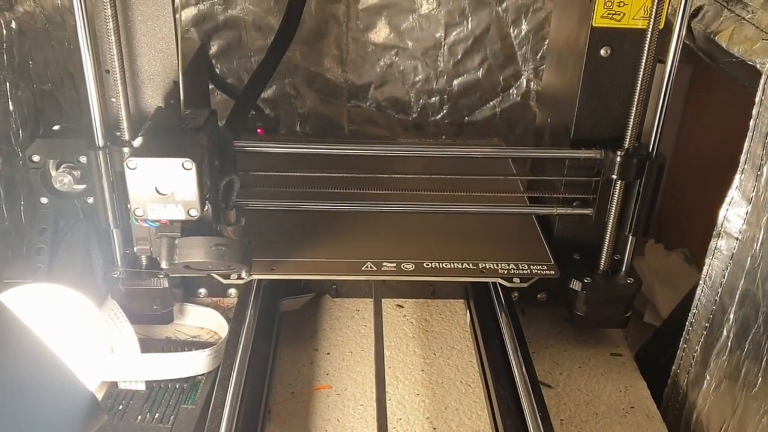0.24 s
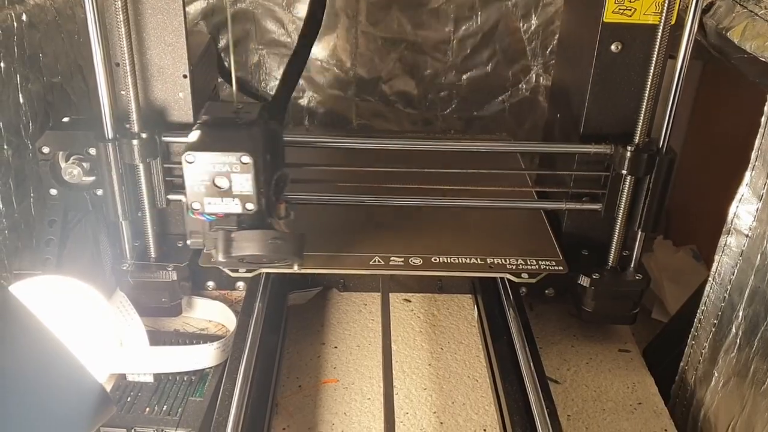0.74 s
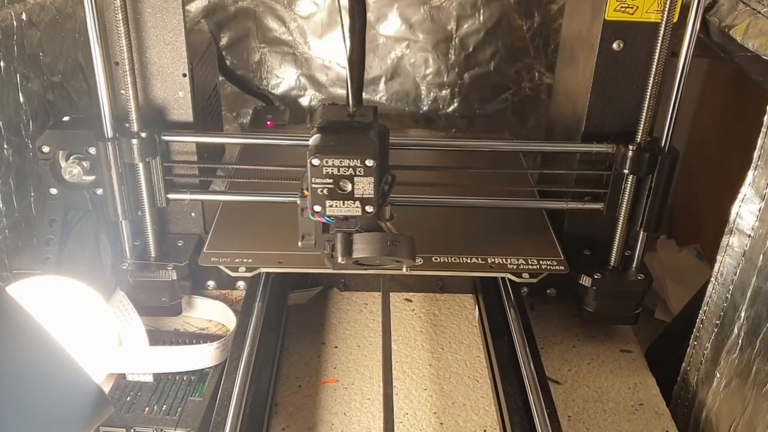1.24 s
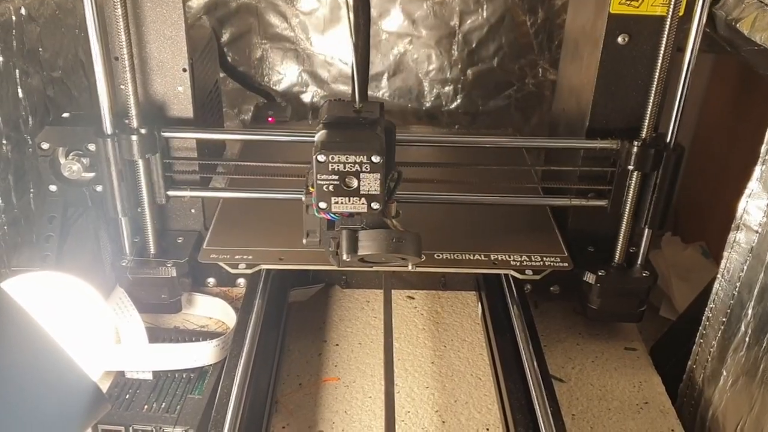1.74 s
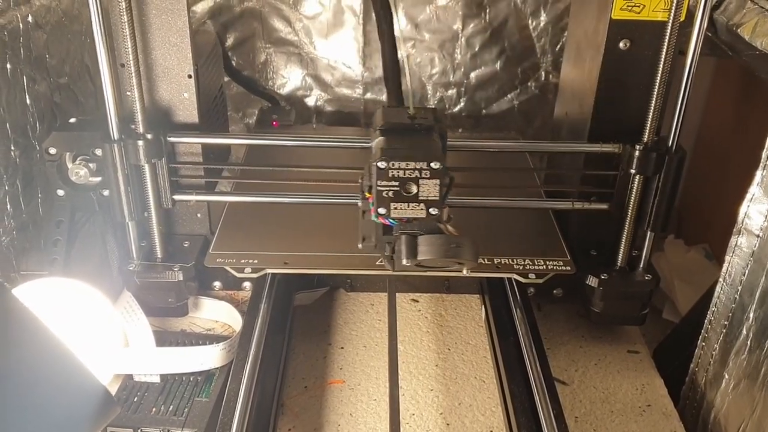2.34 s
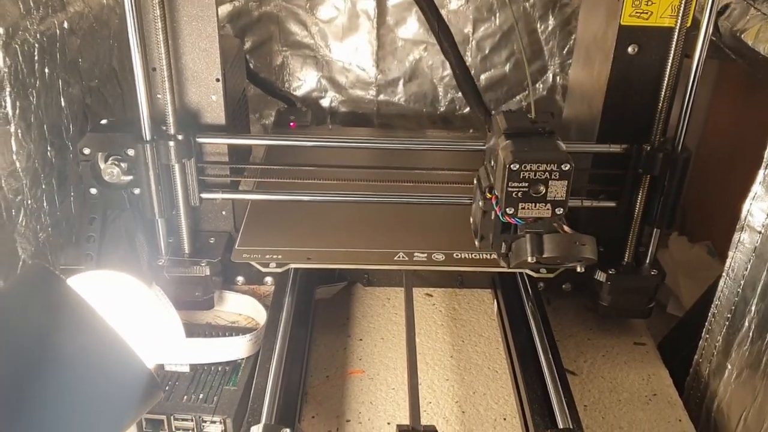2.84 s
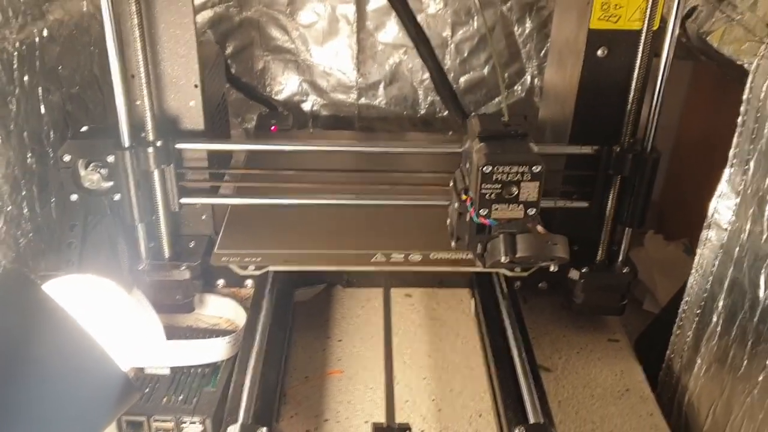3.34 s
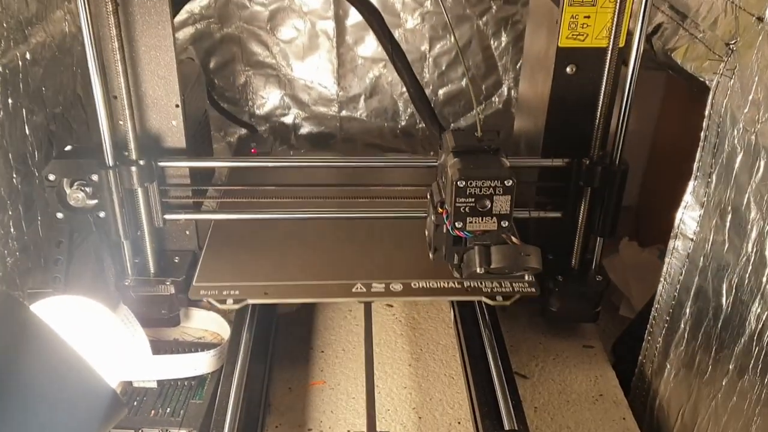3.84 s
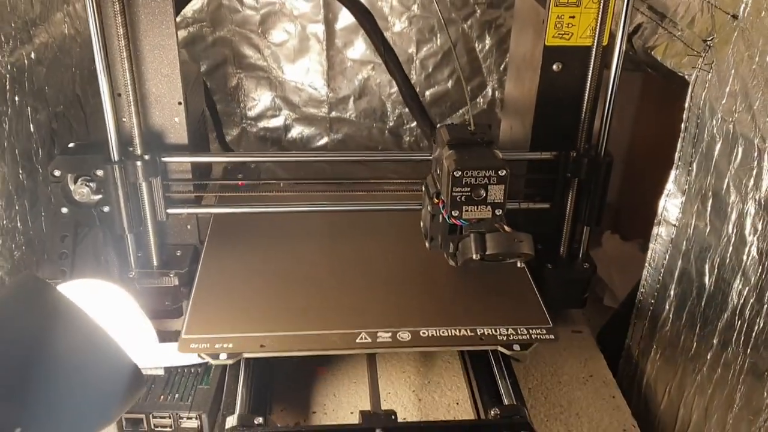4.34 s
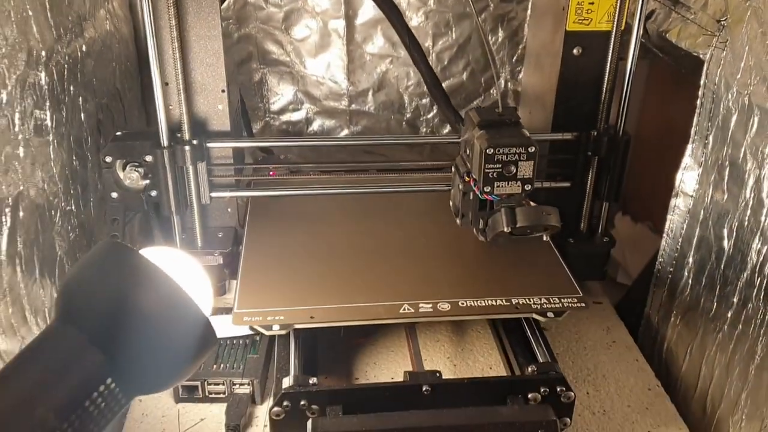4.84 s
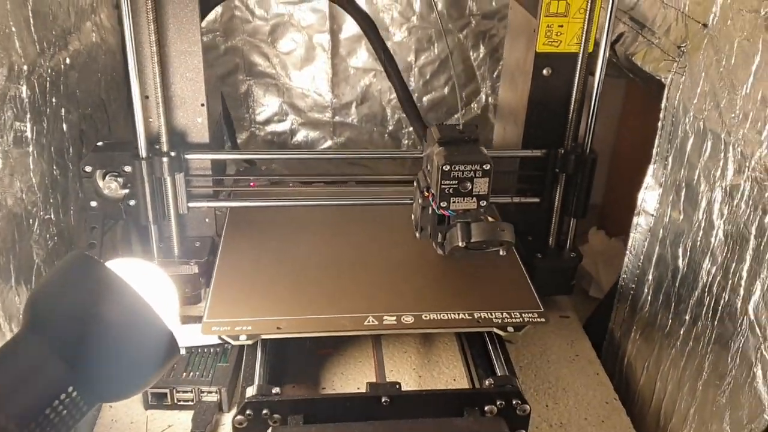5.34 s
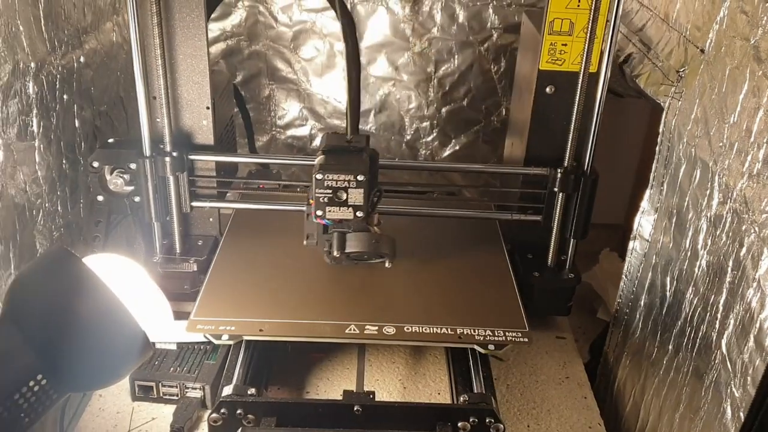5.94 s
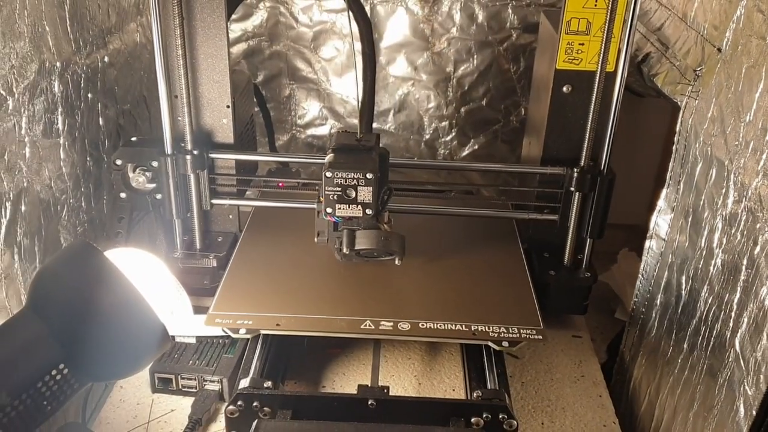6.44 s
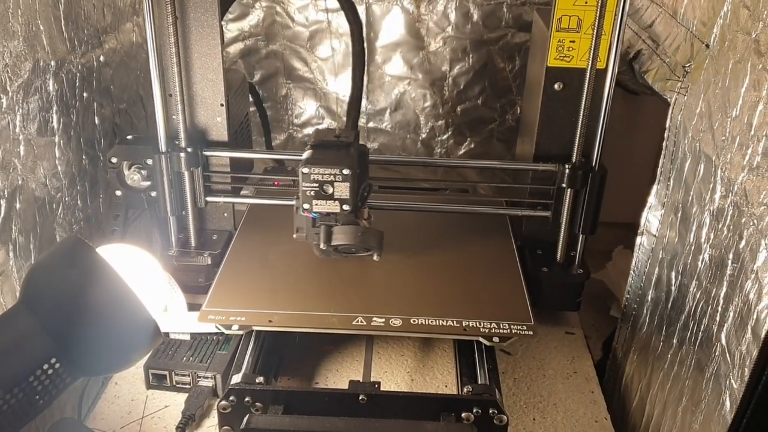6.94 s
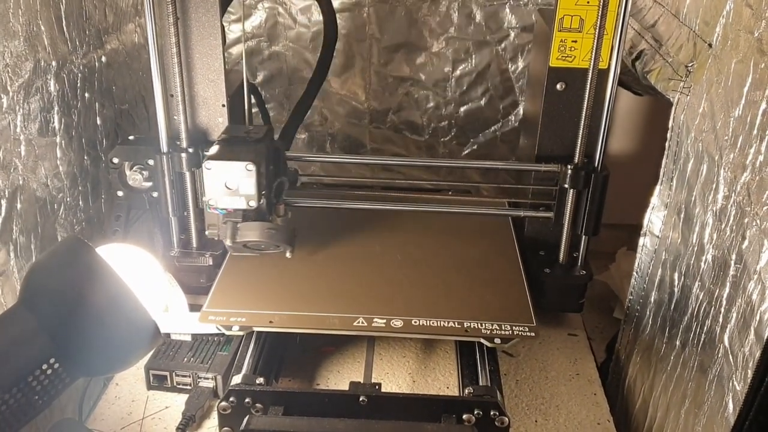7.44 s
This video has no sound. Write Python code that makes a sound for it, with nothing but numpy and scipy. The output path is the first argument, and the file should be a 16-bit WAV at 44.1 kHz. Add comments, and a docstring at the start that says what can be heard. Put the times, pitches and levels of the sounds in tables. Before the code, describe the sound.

A close stereo view of a 3D printer in a small reflective enclosure, with faint fan murmur and thin, high motor hiss throughout. It opens with four dull frame-buzzing taps, about a ninth of a second apart, and a lift-off thud near 0.5 s. A belt move follows until 1.4 s: the whine rises quickly, holds steady with grainy bearing rattle and brighter hiss, then falls into a low double jolt. Four taps and a lift-off lead to the next move, 2.05-2.95 s. Scuffs surround the taps around 3.1-3.5 s. The heavier, louder bed move runs 3.6-4.55 s, with short hollow booms. During the following taps, a hard gritty rub with a sinking groan strikes at 4.9 s. Lighter head moves run 5.2-6.1 s and from 6.8 s, separated by four more taps; the last whir slows near 7.7 s.

```python
"""Printer bed probing

A 3D printer probes its bed inside a foil-lined enclosure, over fan murmur and the hiss of holding current.
Five times a belt axis speeds up, cruises and brakes: step-locked whine, clumped bearing clicks, chopper hiss.
Between moves the lead screws dive, tap the bed four times and lift off; swelling tones make the frame drone.
Tuned booms, band-limited scuffs and one hard rub of grit and sinking tone break in."""
import sys
import numpy as np
from scipy import signal
from scipy.fft import rfft, irfft, next_fast_len
from scipy.io import wavfile
from scipy.ndimage import uniform_filter1d, map_coordinates

SR = 44100
rng = np.random.default_rng(int(sys.argv[2]) if len(sys.argv) > 2 else 0)


def materialize(psi):
    """Save the field psi as 16-bit PCM at rate SR to the path in sys.argv[1].

    A 1-D psi becomes a single channel; in a 2-D psi each row is a channel.
    """
    bounded = np.clip(np.atleast_2d(psi).T, -1, 1)
    quanta = np.round(bounded * 32767).astype(np.int16)
    wavfile.write(sys.argv[1], SR, quanta)


N = 338555  # length in samples


def amp(db):
    """Decibels to gain."""
    return 10 ** (np.asarray(db) / 20)


def unit(x):
    """Scale to rms 1."""
    return x / np.sqrt(np.mean(x ** 2) + 1e-20)


def clock():
    """Time of each sample in seconds."""
    return np.arange(N) / SR


def along(points, hz):
    """Read a (frequency [Hz], value) curve on a log frequency axis."""
    f, v = np.transpose(points)
    return np.interp(np.log(hz + 1), np.log(f + 1), v)


def curves(rows):
    """One value per sample for each column after the time."""
    s, *columns = np.transpose(rows)
    return [np.interp(clock(), s, column) for column in columns]


def wobble(rate, size=N):
    """A smooth random curve, rate knots a second."""
    knots = rng.standard_normal(int(size * rate / SR) + 4)
    return map_coordinates(knots, [np.arange(size) * rate / SR])


def filtered(x, response):
    """Shape x by a response given as a function of frequency."""
    m = next_fast_len(x.shape[-1] + 8192)
    return irfft(rfft(x, m) * response(np.fft.rfftfreq(m, 1 / SR)), m)[..., :x.shape[-1]]


def noise(spectrum, size=N):
    """Mid and side noise of rms 1, coloured by a spectrum."""
    white = rng.standard_normal((2, size))
    return unit(filtered(white, lambda hz: amp(along(spectrum, hz))))


def swell(x, centre, half):
    """A smooth bell-shaped rise and fall around a centre."""
    return np.exp(-.5 * ((x - centre) / half) ** 2)


def turning(hz):
    """Phase of a changing frequency."""
    return 2 * np.pi * np.cumsum(hz) / SR


def tone(phase):
    """Mid and side sine of rms 1, each arriving at a phase of its own."""
    return np.sqrt(2) * np.sin(phase + rng.uniform(0, 2 * np.pi, (2, 1)))


def reverb(x, seconds, t60, wet_db):
    """Add a decaying noise tail to x; wet_db is the level of the tail over the direct sound."""
    t = np.arange(int(seconds * SR)) / SR
    tail = rng.standard_normal((2, len(t))) * amp(-60 * t / t60)
    wet = signal.fftconvolve(x, tail / np.linalg.norm(tail[0]), axes=1)[:, :x.shape[1]]
    return x + amp(wet_db) * wet


def enclosure(x, t60, wet_db):
    """Dense short reflections of the foil walls ripple the spectrum; the result has rms 1."""
    return unit(reverb(x, .2, t60, wet_db))


def room(x, t60, wet_db):
    """A soft tail from the room outside the enclosure."""
    return reverb(x, .5, t60, wet_db)


# Probings, four even taps then a lift-off: (lift-off time [s], pace [s], extra wait after the first tap [s],
# tap level [dB], rebound level [dB], lift start level [dB], lift stop level [dB],
# frame pitch [Hz], jolt half length [s])
PROBES = [(0.482, .113, 0, -36.5, -42.5, -36, -36.5, 153, .0095),
          (2.049, .115, 0, -36.3, -46, -33.5, -38, 154, .0098),
          (3.619, .116, 0, -33.2, -38.5, -32, -31, 156, .0072),
          (5.212, .114, .043, -35.5, -39.5, -36, -32, 156, .008),
          (6.786, .113, .018, -37.8, -42, -35.8, -34.3, 152, .0115)]
TAP_COUNT = 4


def tap_times(probe):
    """The taps of one probing, counted back from the lift-off at its pace."""
    lift, pace, wait = probe[:3]
    return [lift - k * pace - wait * (k == TAP_COUNT) for k in range(TAP_COUNT, 0, -1)]


# Each probing place: (creep level [dB], creep pitch [Hz], creep half length [s],
# holding current hiss level [dB], screw rasp level relative to the strokes [dB])
PLACES = [(-45, 82, 0.019, -56.5, -31.5), (-46, 84.5, 0.03, -54.5, -44), (-42, 82.5, 0.03, -52.5, -26),
          (-42.5, 83, 0.032, -51.5, -23.5), (-43, 88, 0.04, -51.5, -21.5)]


def resting():
    """Holding hiss and screw rasp in dB: steady through each probing, changing during the moves."""
    rows = []
    for probe, place in zip(PROBES, PLACES):
        for s in (tap_times(probe)[0] - .25, probe[0] + .1):
            rows.append((s, *place[-2:]))
    return curves(rows)


# Machine at rest, room murmur: (frequency [Hz], relative level per Hz [dB])
ROOM = [(18, -27), (50, 15), (170, 11.5), (280, 6.5), (480, 3.5), (640, -3.5), (870, -6.5), (1100, 2),
        (2100, 1.5), (3100, -17.5), (5000, -30), (9000, -26)]
# Faint whistle of the holding current: (frequency [Hz], relative level per Hz [dB])
WHISTLE = [(10300, -38), (11100, 3), (11300, 3), (11550, -3), (12300, -28)]
WHISTLE_S, WHISTLE_HALF_S, WHISTLE_DB = 6.48, 0.43, -62.5  # centre, half length, level
# Chopper hiss as the motor bodies radiate it: (frequency [Hz], relative level per Hz [dB])
CHOPPER = [(3000, -42.5), (6400, -16), (9200, -17), (10300, -8.5), (11800, -3.5), (13200, -4), (15200, 1),
           (16000, 0.5)]


def idle():
    """Enclosed noise for the fans, and high bands for the motors' holding current and its whistle."""
    air = enclosure(noise(ROOM), t60=0.15, wet_db=-4.5)
    murmur = amp(1.8 * wobble(12)) * air
    whistle = amp(WHISTLE_DB) * swell(clock(), WHISTLE_S, WHISTLE_HALF_S) * noise(WHISTLE)
    return amp(-61.0) * murmur + amp(resting()[0]) * noise(CHOPPER) + whistle


# Booms of the bed and frame: (time [s], level before a 5 dB cut [dB], pitch [Hz], half length [s])
BOOMS = [(2.24, -50, 50.1, 0.048), (3.663, -43, 332, 0.0042), (3.684, -38, 50, 0.011),
         (3.776, -37.5, 280, 0.0087), (3.85, -41.5, 576, 0.019), (4.02, -35, 573, .016),
         (4.178, -40, 55.4, 0.017), (6.963, -49, 54, 0.036)]


def booms():
    """The bed and frame swell briefly at their resonances, each a sine under a bell envelope."""
    t = clock()
    return sum(amp(db - 5.0) * swell(t, s, half) * tone(2 * np.pi * hz * t) for s, db, hz, half in BOOMS)


RUB_START_S, RUB_DB = 4.912, -45
RUB_ATTACK_S, RUB_HOLD_S, RUB_DECAY_DB_PER_S = 0.027, 0.052, 140  # envelope of the grit
RUB_HZ, RUB_SAG_OCTAVES_PER_S = 500, 7.5  # the tone's starting pitch and fall
RUB_TONE_DB, RUB_TONE_S = -3.5, 0.12  # mean tone level relative to RUB_DB, and its hold
# Grit of the rub: (frequency [Hz], relative level per Hz [dB])
RUB_GRIT = [(150, -7), (300, 9.5), (550, -3), (900, 3.5), (1300, 2), (2200, 1.5), (3000, -9), (4200, -22),
            (9000, -35)]


def rub():
    """A hard rub: grit starts abruptly and dies away around a rough sinking tone."""
    t = np.clip(clock() - RUB_START_S, 0, 1)

    def held(hold):
        return np.minimum(t / RUB_ATTACK_S, 1) * amp(-RUB_DECAY_DB_PER_S * np.maximum(t - hold, 0))

    phase = turning(RUB_HZ * 2 ** (-RUB_SAG_OCTAVES_PER_S * t)) + 0.77 * wobble(220)
    grit = noise(RUB_GRIT) * amp(1.0 * wobble(400)) * (1 + .5 * np.cos(phase))
    groan = amp(RUB_TONE_DB + 2.5 * wobble(120)) * (tone(phase) + 0.28 * tone(2 * phase))
    return amp(RUB_DB) * (held(RUB_HOLD_S) * grit + held(RUB_TONE_S) * groan)


# Dives of the head after a move: (start time [s], stop time [s],
# starting jolt level [dB], stopping jolt level [dB], frame pitch [Hz])
DIVES = [(1.396, 1.44, -35.5, -31.5, 158), (2.958, 3.005, -31, -30.5, 163),
         (4.531, 4.603, -31.5, -31.5, 155), (6.14, 6.201, -34, -33.5, 158)]
DIVE_JOLT_S, DIVE_RUN_DB = 0.01, -6.5  # jolt half length; drone of the run relative to the stopping jolt
SETTLE_S, SETTLE_DB = 0.041, -8  # the frame swings once more after the stop; level relative to it
REBOUND_S, REBOUND_HALF_S = 0.043, 0.014  # each hop off the bed ends with another jolt this much later
LIFT_S, LIFT_PITCH, LIFT_LENGTH = .05, 1.055, 1.23  # duration; jolt pitch and length as multiples of a tap's


def jolts():
    """Lead screw strokes and the frame's swings: (time [s], peak level [dB], pitch [Hz], half length [s])."""
    rows = []
    for start, stop, start_db, stop_db, hz in DIVES:
        length = stop - start
        rows += [(start, start_db, hz, DIVE_JOLT_S), (stop, stop_db, hz, DIVE_JOLT_S),
                 (start + 0.55 * length, stop_db + DIVE_RUN_DB, hz, 0.12 * length),
                 (stop + SETTLE_S, stop_db + SETTLE_DB, hz, REBOUND_HALF_S)]
    for probe in PROBES:
        lift, _, _, tap_db, rebound_db, start_db, stop_db, hz, half = probe
        for s in tap_times(probe):
            rows += [(s, tap_db, hz, half), (s + REBOUND_S, rebound_db, hz, REBOUND_HALF_S)]
        for s, db in [(lift, start_db), (lift + LIFT_S, stop_db)]:
            rows.append((s, db, hz * LIFT_PITCH, half * LIFT_LENGTH))
    return sorted(rows)


# Scuffs: (time [s], level [dB], half length [s], low edge [Hz], high edge [Hz])
SCUFFS = [(1.291, -51.5, 0.051, 500, 2330), (1.444, -62, 0.023, 500, 2280),
          (3.116, -54, 0.0094, 4600, 7470), (3.379, -67.5, 0.075, 4430, 7600),
          (3.484, -48, 0.027, 4830, 16100), (4.57, -53, 0.014, 900, 3220), (4.72, -58.5, .13, 696, 7000),
          (4.947, -55, 0.11, 2200, 7000)]
# Scuff of the nuts as a fast stroke stops: level relative to the jolt, half length, band edges
NUT_DB, NUT_HALF_S, NUT_LOW_HZ, NUT_HIGH_HZ = -24.5, .018, 534, 2140


def nut_scuffs():
    """A scuff at the hard stop of each dive and lift, in the columns of SCUFFS."""
    stops = [(stop, db) for _, stop, _, db, _ in DIVES]
    stops += [(lift + LIFT_S, db) for lift, *_, db, _, _ in PROBES]
    return [(s, db + NUT_DB, NUT_HALF_S, NUT_LOW_HZ, NUT_HIGH_HZ) for s, db in stops]


def scuffs():
    """Short grainy rubs: noise of flickering level, each in its own band."""
    out = np.zeros((2, N))
    for s, db, half, low_hz, high_hz in SCUFFS + nut_scuffs():
        near = np.abs(clock() - s) < 4 * half
        t = clock()[near]
        grains = rng.standard_normal((2, len(t))) * amp(1.15 * wobble(400, size=len(t)))
        band = lambda hz: 1 / np.sqrt((1 + (low_hz / (hz + 1)) ** 6) * (1 + (hz / high_hz) ** 8))
        out[:, near] += amp(db) * swell(t, s, half) * unit(filtered(grains, band))
    return out


CREEP_LEAD_S = 0.035  # the slow descent is loudest this long before each tap
DIVE_CREEP_DB = 4.5  # low note at the stop of a dive, relative to the creep


def creeps():
    """Low notes of the slow strokes and dives: (time [s], peak level [dB], pitch [Hz], half length [s])."""
    rows = []
    for probe, (db, hz, half, _, _) in zip(PROBES, PLACES):
        rows += [(s - CREEP_LEAD_S, db, hz, half) for s in tap_times(probe) + [probe[0]]]
        rows.append((probe[0] + .11, db - 2.5, hz + 3, .05))  # after the lift-off
    for (start, stop, *_), (db, hz, *_) in zip(DIVES, PLACES[1:]):
        rows += [(start - .014, db - 1, hz, .014), (stop, db + DIVE_CREEP_DB, hz, .016)]
    return sorted(rows)


def drone(rows):
    """Strength and phase of one tone that swells on each stroke and slides between their pitches."""
    t = clock()
    coarse = t[::32]
    strength = sum(amp(db) * swell(coarse, s, half) for s, db, hz, half in rows)
    return np.interp(t, coarse, strength), turning(curves(rows)[1])


# Trembling frame: (frequency [Hz], relative level per Hz [dB])
SHUDDER = [(25, -26), (50, -2), (85, -12), (115, 0), (140, -4), (175, 5), (220, -8), (270, -18), (600, -47),
           (1500, -92)]


def lead_screws():
    """The frame drones and shudders on every stroke, and the nuts rasp faintly on the threads."""
    stroke, stroke_phase = drone(jolts())
    creep, creep_phase = drone(creeps())
    hum = stroke * (np.sin(stroke_phase + 0.45 * wobble(90)) + amp(-40.5) * np.sin(2 * stroke_phase))
    hum += creep * np.sin(creep_phase + 0.5 * wobble(40))
    # averaging over 5000 samples keeps the frame trembling between strokes
    shaking = amp(-12) * np.abs(uniform_filter1d(stroke, size=5000))
    shudder = shaking * noise(SHUDDER)
    threads = noise([(150, 2.0), (350, 1), (750, -12), (1100, 4.5), (2100, -1), (3200, -16), (8000, -14)])
    rasp = amp(resting()[1]) * (stroke + shaking / 2) * threads
    quarter_turn = np.imag(signal.hilbert(hum))  # the side gets the hum a quarter cycle apart
    return np.array([hum, quarter_turn]) + shudder + rasp


def whine(phase, speed, orders, waver_db, waver_rad):
    """Partials locked to the coil cycle; each wavers, and the high ones sing only near full speed."""
    n = len(phase)

    def partial(k, db):
        level = amp(db + waver_db * wobble(9.0, size=n))
        return level * tone(k * phase + waver_rad * wobble(41.5, size=n))

    return sum(partial(k, db) * speed ** np.sqrt(k) for k, db in orders)


FRAME_HZ, FRAME_WIDTH_HZ = 160.4, 32.2  # ring of the frame that the low partials sweep through
SLOW_PARTIALS_DB = 1.5  # level of the second and fourth partials relative to the hum


def frame_sweep(phase, speed):
    """On a ramp the hum, its octave and the full-step tone each ring the frame as they cross its pitch."""
    n = len(phase)

    def crossing(k):
        ring = swell(k * STEP_HZ * speed, FRAME_HZ, FRAME_WIDTH_HZ)
        return ring * tone(k * phase + 0.99 * wobble(100, size=n))

    slow = crossing(2) + crossing(4)
    return amp(2.8 * wobble(60.05, size=n)) * (crossing(1) + amp(SLOW_PARTIALS_DB) * slow)


def rattle(phase, spectrum, band, grain_db, throb):
    """Bearing balls click in dense clumps, pushed along by the motor steps; mid has rms 1 inside the band."""
    n = len(phase)
    pushes = 1 + throb * np.cos(2 * phase)  # two pushes a coil cycle
    clicks = rng.standard_normal((2, n)) * amp(grain_db * wobble(700, size=n)) * pushes
    body = filtered(enclosure(clicks, t60=0.076, wet_db=1.5), lambda hz: amp(along(spectrum, hz)))
    return body / np.std(filtered(body[0], lambda hz: (hz > band[0]) & (hz < band[1])))


# Frame resonances under the rattle as the carriage passes:
# (time [s], half length [s], centre [Hz], width [Hz], gain at the centre [dB])
RINGS = [(0.703, 0.18, 1110, 129, 6), (1.266, 0.092, 1120, 130, 6.5), (2.501, 0.42, 450, 298.7, -2.5),
         (2.707, 0.1, 1800, 301.7, 2.5), (4.092, 0.087, 1400, 120, 7.5), (4.38, .03, 784, 119, -1),
         (5.443, 0.028, 1100, 150, 13), (5.877, 0.3, 1110, 85, 10.5), (7.253, 0.55, 1150, 139.5, 6),
         (7.25, 0.31, 4710, 140, 9.5), (7.44, 0.082, 1570, 250, 9.5)]


def frame_rings(x, t):
    """Each resonance lifts or dips its own band for a stretch of the travel."""
    out = x
    for s, half, centre, width, db in RINGS:
        if t[0] < s < t[-1]:
            peak = lambda f: 1j * f * width / (centre ** 2 - f ** 2 + 1j * f * width)
            out = out + (amp(db) - 1) * swell(t, s, half) * filtered(x, peak)
    return out


def chopper_beat(phase, chop_hz, width_hz):
    """The jittery chopper beats with the microstep rate: a band that dives as the motor speeds up."""
    n = len(phase)
    jitter = unit(filtered(rng.standard_normal((2, n)), lambda hz: 1 / (1 + (hz / width_hz) ** 2)))
    beat = jitter * np.cos(turning(np.full(n, chop_hz)) - 64 * phase)
    radiation = [(6000, -54), (8800, -20.0), (10200, -7.5), (12000, 1.0), (13200, -3.5), (15000, 9)]
    return filtered(beat, lambda hz: amp(along(radiation, hz)))


HUM_PEAK_S, STEP_PEAK_S = 0.11, 0.1  # half lengths of the belt peaks
HISS_RISE_DB_PER_S = 1  # the chopper grows louder through a move


def cruise(move, belt, t):
    """Levels in dB along one move: rattle, bright rattle, hiss, hum, full-step tone, whine."""
    start, end, _, rattle_db, balls_db, rise, hiss_db, whine_db, *_ = move
    hum_db, hum_s, hum_lift_db, step_db, step_s, step_lift_db = belt
    late = t - (start + end) / 2
    return (rattle_db + rise * late, balls_db + rise * late,
            hiss_db + HISS_RISE_DB_PER_S * late,
            hum_db + hum_lift_db * swell(t, hum_s, HUM_PEAK_S),
            step_db + step_lift_db * swell(t, step_s, STEP_PEAK_S),
            whine_db + 3.4 * wobble(12.7, size=len(t)))


STEP_HZ = 233.18  # coil cycles a second at full speed
CASE_DB = -56  # the motor case ringing on the ramps
PLATE_HZ, PLATE_WIDTH_HZ, PLATE_DB = 604, 120, -61  # frame plate that the full-step tone sweeps through
# Other partials of the head and bed motors: (multiple of the coil cycle, level before the move's trim [dB])
HEAD_ORDERS = [(2, -71.0), (3, -67.9), (6, -66.6), (7, -68.0), (8, -62.2), (12, -69.4), (20, -71.0),
               (27, -69.9), (29, -72.0), (30, -71.9), (31, -61.6), (32, -65.2), (33, -69.9), (35, -68.6),
               (37, -68.9), (48, -69.1), (49, -67.1), (50, -65.8), (51, -67.7), (52, -66.5), (54, -62.3),
               (55, -65.6), (57, -68.3), (59, -65.7), (61, -62.2), (63, -57.9), (64, -63.2), (65, -65.9),
               (66, -60.6), (67, -63.3)]
BED_ORDERS = [(2, -61.8), (3, -61.8), (5, -63.0), (6, -59.4), (7, -69.9), (8, -56.8), (14, -70.3),
              (16, -69.1), (22, -71.1), (24, -63.4), (26, -72.3), (29, -64.9), (30, -66.9), (31, -69.4),
              (32, -68.9), (33, -67.8), (35, -70.3), (36, -67.7), (47, -66.1), (48, -68.2), (49, -62.3),
              (50, -54.3), (51, -57.4), (52, -62.0), (53, -61.0), (54, -63.0), (62, -63.2), (64, -67.8),
              (65, -57.8), (66, -62.4)]
# Bearings and belts of each axis: (frequency [Hz], relative level per Hz [dB])
HEAD_RATTLE = [(18, -35), (40, -5), (70, 4.5), (150, 4), (330, -10.5), (620, -1.5), (860, -15.5), (1000, 7),
               (1300, -1), (1850, 2.5), (2400, -3), (3200, -9.5), (5000, -14.5)]
BED_RATTLE = [(18, -30), (45, 2), (75, 11), (150, 0), (400, -2.5), (590, 11), (850, -6), (1100, 4.5),
              (1800, 0.5), (2400, -0.5), (3200, -4.5), (5000, -15)]
# Bright steel rattle of the bearing balls: (frequency [Hz], relative level per Hz [dB])
BALLS = [(1800, -5), (3000, 0), (3600, -2.5), (4700, -1), (5400, -2.5), (6800, -0.5), (9000, -15),
         (12000, -45)]


def travel(move, belt, ramp=.18, onset=0.5):
    """One belt move: speed ramps up, holds and ramps down, and drives the motor tones and the noises."""
    start, end, axis, *_, partials_db, sweep_db = move
    a, b = int(start * SR), min(int(end * SR), N)
    t = clock()[a:b]
    n = len(t)
    speed = np.clip(np.minimum(t - start, end - t) / ramp, 0, 1)
    phase = turning(STEP_HZ * speed)
    running = 1 / (1 + np.exp((onset - speed) / 0.075))  # the driver turns noisy rather suddenly
    rattle_db, balls_db, hiss_db, hum_db, step_db, whine_db = cruise(move, belt, t)
    orders, spectrum = (BED_ORDERS, BED_RATTLE) if axis > .5 else (HEAD_ORDERS, HEAD_RATTLE)
    throb = .1

    main = [(1, hum_db), (4, step_db), (28, whine_db)]
    tones = amp(1.5) * whine(phase, speed, main, waver_db=1.5, waver_rad=0.15)
    tones += amp(partials_db) * whine(phase, speed, orders, waver_db=3, waver_rad=.2)
    # on the ramps the whine sweeps through the motor case, the low partials through frame and plate
    tones += amp(CASE_DB) * swell(speed, .87, .06) * tone(28 * phase + 1.1 * wobble(700, size=n))
    tones += amp(sweep_db) * frame_sweep(phase, speed)
    plate = swell(4 * STEP_HZ * speed, PLATE_HZ, PLATE_WIDTH_HZ)
    tones += amp(PLATE_DB) * plate * tone(4 * phase + 1.2 * wobble(300, size=n))

    low_rattle = rattle(phase, spectrum, (900, 3000), grain_db=3.5, throb=throb)
    bright_rattle = rattle(phase, BALLS, (3000, 6300), grain_db=3.0, throb=throb)
    bearings = amp(rattle_db - 3) * (0.39 + 0.62 * running) * speed ** 0.32 * low_rattle
    bearings += amp(balls_db - 3) * running * speed * bright_rattle

    flutter = 1 + throb * (np.cos(phase) + np.cos(2 * phase)) / 2
    hiss = amp(hiss_db + 3.5 + 1.2 * wobble(30.2, size=n)) * running * flutter * noise(CHOPPER, size=n)
    hiss += amp(hiss_db + 8) * running * chopper_beat(phase, chop_hz=22320, width_hz=1440)

    placed = lambda x: np.pad(x, ((0, 0), (a, N - b)))
    return placed(tones + hiss) + room(placed(frame_rings(bearings, t)), t60=1.0, wet_db=-8.5)


# Belt moves, levels before the trims in travel(): (start time [s], end time [s], axis [0 = head, 1 = bed],
# rattle level [dB], bright rattle level [dB], rise of both [dB/s], chopper hiss level [dB],
# whine level [dB], trim of the other partials [dB], frame ringing level on the ramps [dB])
MOVES = [(0.498, 1.404, 0, -52.5, -57, -5, -51, -63, -1.7, -51),
         (2.055, 2.967, 0, -50, -54.5, 2.5, -48, -59, -0.39, -49),
         (3.625, 4.537, 1, -46.5, -50, 3, -46, -59.5, -1, -53),
         (5.221, 6.135, 0, -53, -52, 3, -47, -63, -1.3, -48),
         (6.796, 7.705, 0, -50, -51.5, 3, -47.5, -63.5, -0.11, -49.5)]
# In each move the belt span passes through tune with the hum and the full-step tone, levels before
# a 1.5 dB boost: (hum level [dB], its peak time [s], its lift [dB],
# full-step tone level [dB], its peak time [s], its lift [dB])
BELT_PEAKS = [(-59, .84, 10, -69.5, 0.97, 8.5), (-62, 2.8, 6.5, -70, 2.33, 14),
              (-56.5, 3.48, 1, -60, 4.27, 8), (-67.5, 5.6, 14, -68, 5.81, 13),
              (-61.5, 7.56, 9.5, -66.5, 7.28, 10.5)]


def belt_moves():
    """All the belt moves, each with its own passage through the belt's tuning."""
    return sum(travel(move, belt) for move, belt in zip(MOVES, BELT_PEAKS))


# Stereo width: (frequency [Hz], side level relative to mid [dB])
WIDTH = [(30, 5.5), (80, -15.5), (160, -20), (300, -6.5), (600, -8), (1300, -1), (3000, 0.5), (15000, -0.5)]
# Stereo balance: (frequency [Hz], left level relative to right [dB])
LEAN = [(60, 0), (92, 1.5), (140, 0.5), (210, 3.0), (330, 4), (500, 1.5), (770, 0), (1170, -1.5),
        (1790, -6), (2740, 1), (4190, 12), (6410, 5.5), (9810, -0.5), (15000, 5.5)]


def scene():
    """Mix the layers as mid and side, then set the width and left-right balance by frequency."""
    both = idle() + booms() + rub() + scuffs() + lead_screws() + belt_moves()
    mid, side = both[0], filtered(both[1], lambda hz: amp(along(WIDTH, hz)))

    def balance(hz):
        gains = amp([along(LEAN, hz) / 2, -along(LEAN, hz) / 2])
        return gains / np.sqrt(np.mean(gains ** 2, axis=0))  # keeps the summed power of the gains

    return filtered(np.array([mid + side, mid - side]), balance)


TOP_HZ = 15850


def record(dry):
    """The microphone chain keeps nothing above its band limit."""
    return filtered(dry, lambda hz: hz < TOP_HZ)


dry = scene()
out = record(dry)
materialize(out)
```